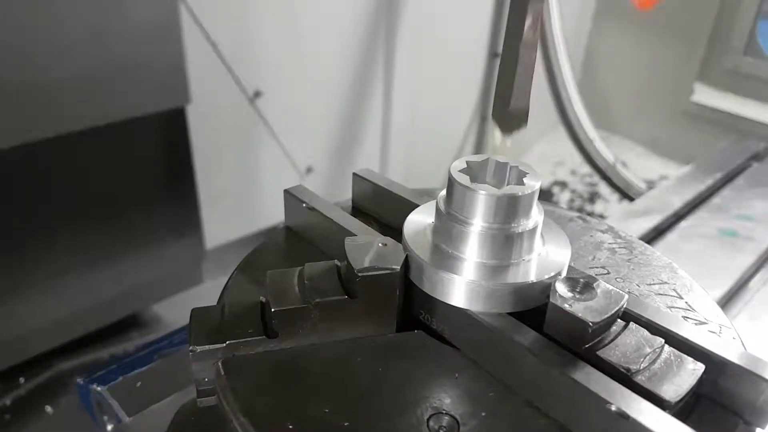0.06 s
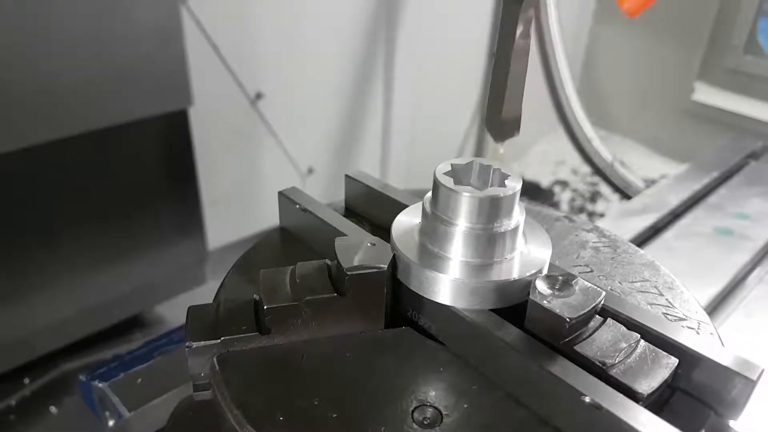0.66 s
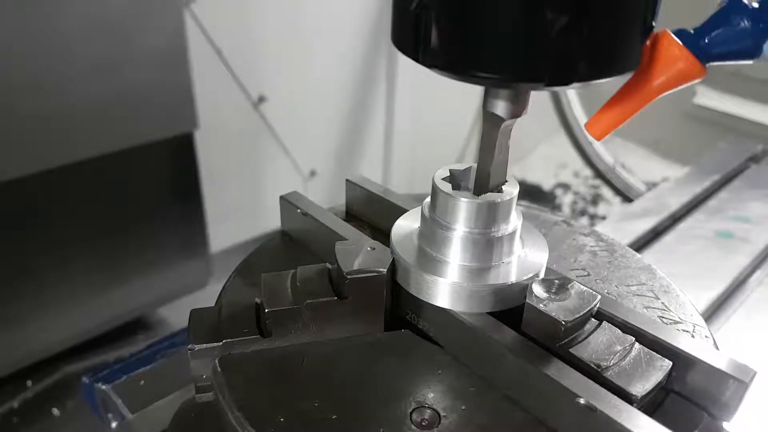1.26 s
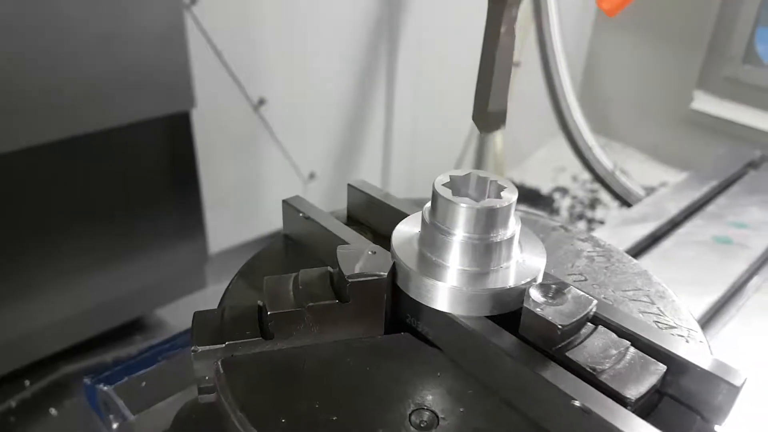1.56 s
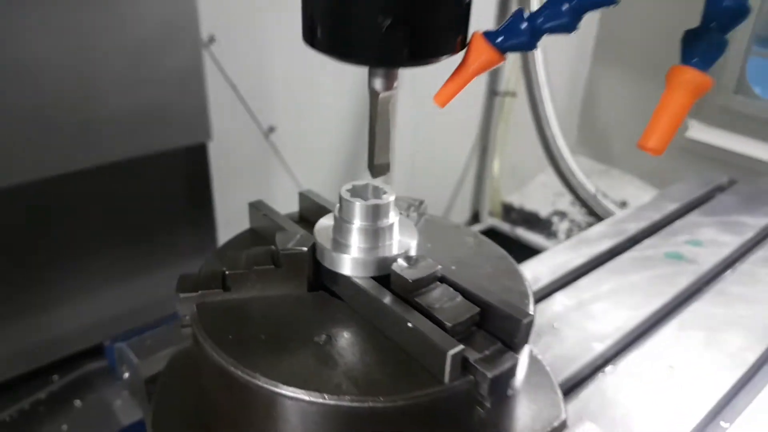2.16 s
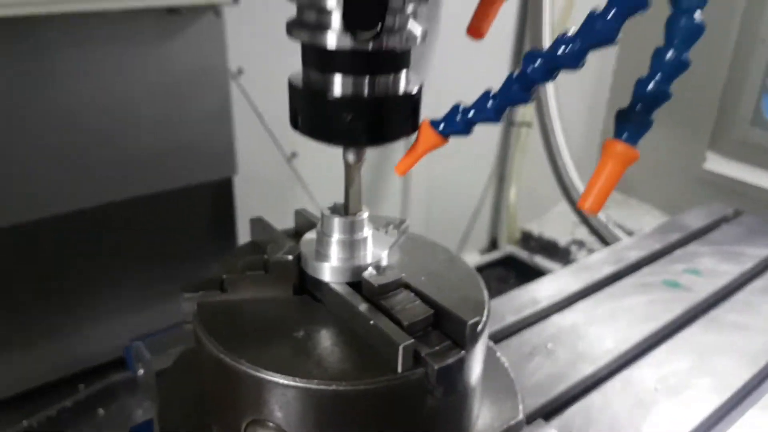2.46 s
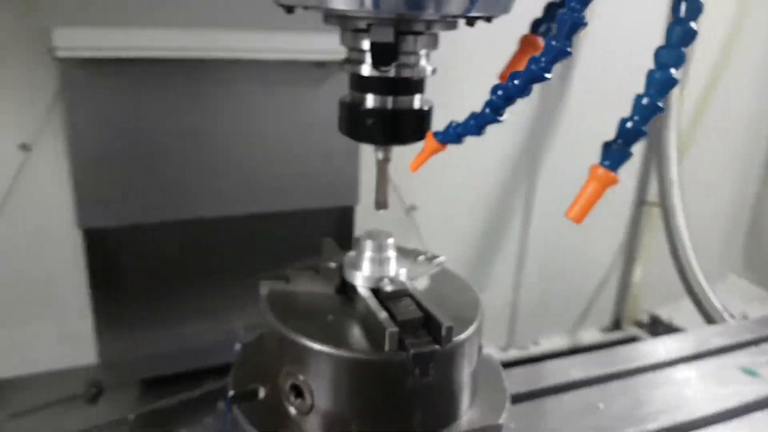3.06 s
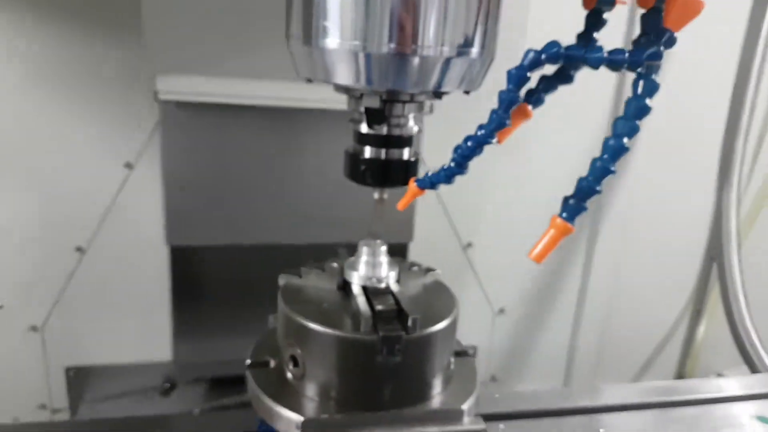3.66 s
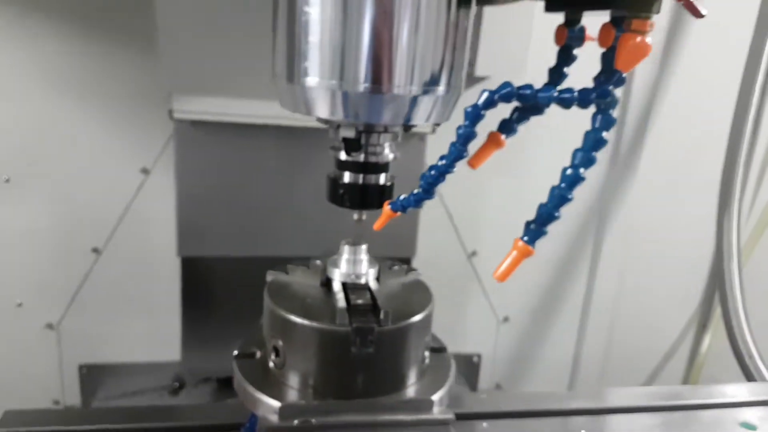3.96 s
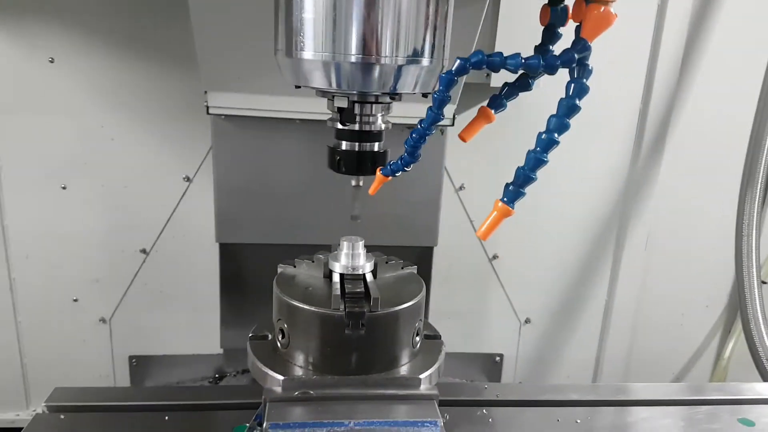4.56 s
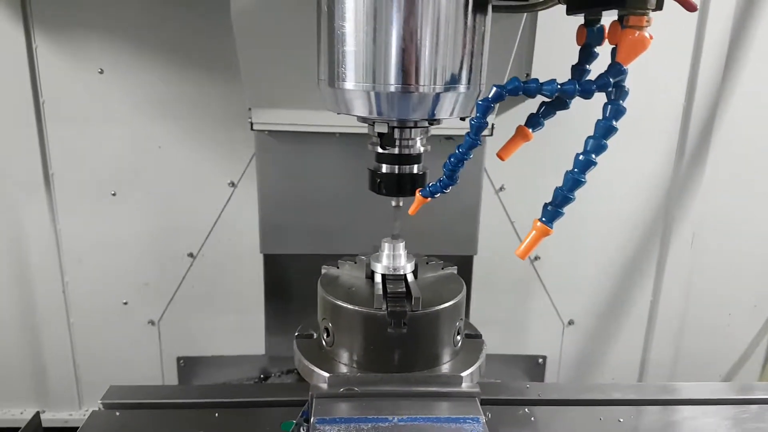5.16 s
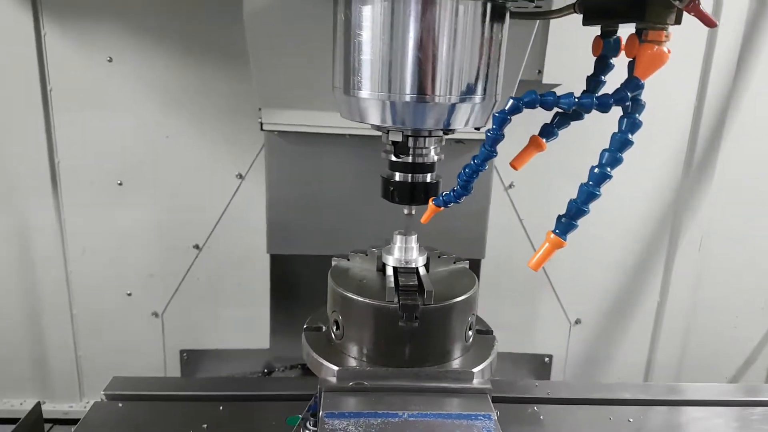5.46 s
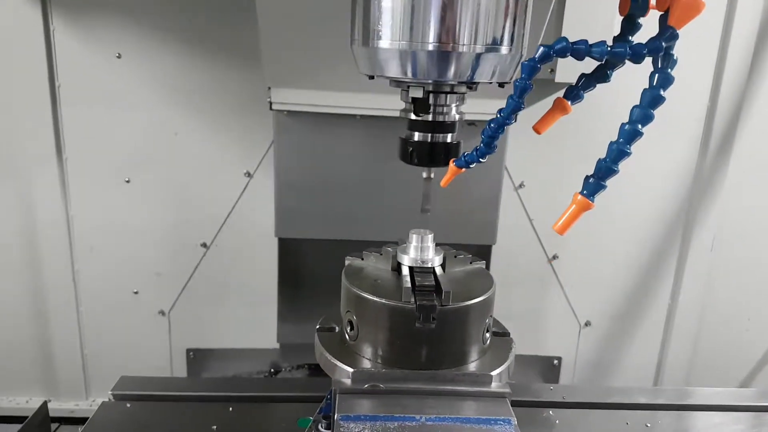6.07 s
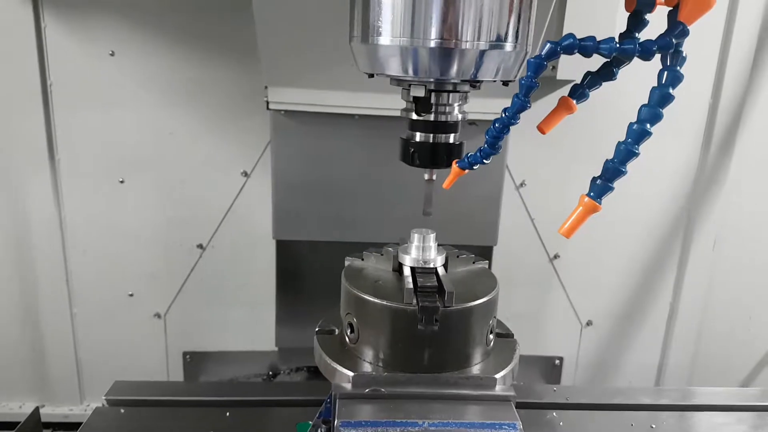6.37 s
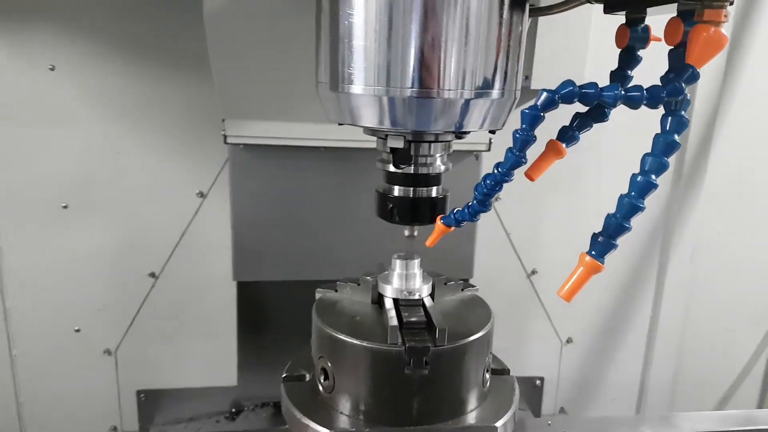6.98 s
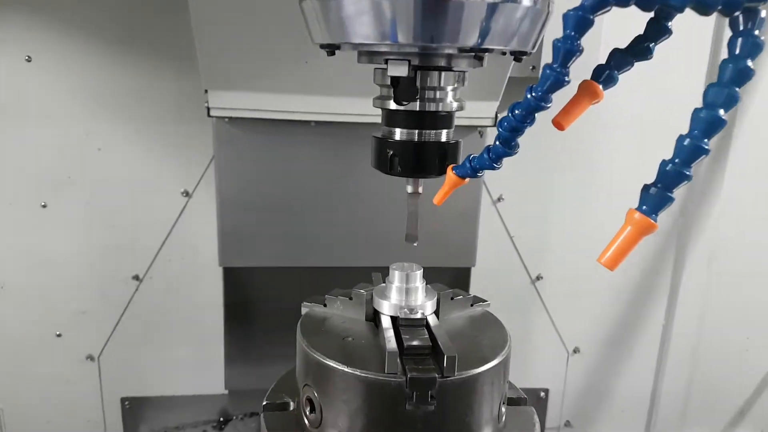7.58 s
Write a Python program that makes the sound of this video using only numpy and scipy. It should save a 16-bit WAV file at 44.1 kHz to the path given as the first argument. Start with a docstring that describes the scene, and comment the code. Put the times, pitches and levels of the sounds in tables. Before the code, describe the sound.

An air nozzle hisses loudly and without a break inside a machine tool's metal cabinet. About every second and a half, as the tool lifts and lowers, the sound swings from a high sizzle to a roaring, breathy whistle. Stray air thumps and rumbles on the close microphone for the first three seconds, then mostly falls away as it backs off. Pump and fans drone underneath.

```python
"""Keyway slotting with an air nozzle.

A machining centre slots a small metal bush inside its sheet-metal cabinet, a stroke about every 1.5 s.
An air nozzle rides with the tool: raised, its jet roars across the open bore and sets it sounding;
lowered, it sizzles on the rim. Deflected air buffets the microphone while close; pump and fans drone."""
import sys
import numpy as np
from scipy import signal
from scipy.fft import rfft, irfft, next_fast_len
from scipy.io import wavfile
from scipy.ndimage import uniform_filter1d

SR = 44100
rng = np.random.default_rng(int(sys.argv[2]) if len(sys.argv) > 2 else 0)


def digitize_waveform(pressure):
    """Quantize a signal to 16-bit integers and store it at the path in sys.argv[1].

    Rows of a 2-D input are taken as channels; values are limited to [-1, 1].
    """
    field = np.atleast_2d(pressure).T
    bounded = np.clip(field, -1, 1)
    quanta = np.round(bounded * 32767).astype(np.int16)
    wavfile.write(sys.argv[1], SR, quanta)


N = 345285

# microphone position, 0 close to 1 far: time_s, far
MIC_DISTANCE = [(0, 0.01), (1.5, 0.047), (2.2, 0.2), (3.0, 0.61), (4.3, 0.71), (5.2, 1), (6.6, 0.88),
                (7.83, 0.97)]
# stereo image of the broad noises: freq_hz, correlation, left_lead_rad
STEREO_IMAGE = [(40, -0.66, -1.5), (119, 1, -2.5), (290, 0.95, 0), (650, 0.58, 0.35), (1490, -0.18, 0),
                (2660, 0.56, 0.5), (3700, 0.06, -2.5), (4370, 0.26, 1.85), (5800, 0.85, 1.5),
                (7460, 0.2, 3), (10200, 0.6, 2), (15000, 0.1, 4)]
# pump and fan spectrum: freq_hz, left_db, right_db
DRONE_SPECTRUM = [(20, -82, -88), (60, -87, -87), (93, -73, -78), (112, -58, -57.5), (143, -60.5, -61.5),
                  (174, -54.5, -55), (198, -58, -58), (221, -51.5, -51), (244, -53.5, -53),
                  (290, -67, -65.5), (346, -60.5, -62), (420, -70.5, -70.5), (630, -65.5, -68.5),
                  (1010, -96, -81)]
# draught until the microphone backs out of the stream: time_s, left_db, right_db
STRAY_DRAUGHT = [(0, -24.5, -28.5), (.55, -28, -39), (1.8, -33.5, -36), (2.85, -29.5, -50),
                 (2.96, -47, -58), (7.83, -93, -49)]
# gusts off the work: peak_s, swell_s, fade_s, left_db, right_db
WORK_GUSTS = [(.03, .08, .05, -17.5, -20), (0.849, 0.13, 0.2, -18, -24), (1.18, 0.15, .13, -15, -16),
              (1.37, .09, .11, -15.5, -15.5), (2.45, .14, 0.17, -24.5, -37), (2.76, 0.14, 0.097, -21, -56),
              (4.18, .06, .06, -26, -48), (5.53, 0.029, .04, -34, -57), (7.09, 0.12, 0.13, -32, -54)]
# strongest single eddies: time_s, relative_db
EDDY_THUMPS = [(0.059, -5), (0.279, -9), (0.35, -6), (0.53, -3), (1.582, -10), (1.942, -13), (2.124, -10),
               (2.167, -3.5), (2.222, -7), (2.375, -4), (2.463, -8), (2.518, -2), (2.611, -3), (2.656, -6),
               (2.715, -6), (2.764, -3), (2.794, -11), (2.898, -5.5), (4.153, -9), (4.179, -15),
               (7.017, -4), (7.029, -6), (7.129, -3.5), (7.164, -7)]
# low cabinet resonance: freq_hz, relative_db
HOLLOW_SPECTRUM = [(800, -30), (1080, -8), (1170, -1), (1340, -2), (1420, -14), (1490, -1), (1620, -10),
                   (1850, -1), (2200, -20), (5000, -45)]
# thin cabinet rings: freq_hz, width_hz, relative_db
CABINET_RINGS = [(2310, 190, -16.5), (4200, 82, -9), (4350, 46, -10.5), (5230, 160, -11)]
# tool strokes, levels as offsets:
# start_s, pause_s, bore_db, bore_hz, graze_db, hollow_db, hiss_db, ring_hz, ring_width_hz, ring_db
TOOL_STROKES = [(-0.125, 0.11, .3, 3900, -.5, 5, 1, 4095, 44.7, -6),
                (1.365, 0.21, 0.4, 3820, 1, 4.5, 0.6, 3740, 220, -7.5),
                (2.8, 0.15, 1, 4050, -0.5, -4, 0.1, 4040, 70, -9),
                (4.25, .18, -0.5, 3830, 1.2, -1.5, 1, 3576, 40, -6.5),
                (5.7, .16, 0.4, 3830, 0.7, -0.5, 2.6, 3690, 55, -9),
                (7.16, 0.14, 3, 4060, 2, 0, 2, 4080, 55, -9)]
# base levels by tool height: height, bore_db, roar_db, graze_db, sizzle_db, hollow_db
LEVELS_BY_HEIGHT = [(0, -38.5, -39.5, -30, -19, -41), (.12, -29, -37.5, -27, -19, -35),
                    (.22, -23, -35.5, -24.5, -18.5, -45), (.36, -21, -31.5, -21.5, -22.5, -34),
                    (.46, -22, -34, -26, -24, -42), (.55, -16.5, -27.5, -23, -26, -39),
                    (.67, -18.5, -29.5, -28, -29.5, -32), (.84, -20.5, -28, -29, -26.5, -34),
                    (1, -22.5, -30.5, -30, -27.5, -33.5)]
# spectra of nozzle hiss, free jet and grazing jet: freq_hz, left_db, right_db
HISS_SPECTRUM = [(400, -72, -75.5), (950, -66.5, -69), (1240, -67, -70.5), (1680, -68.5, -75.5),
                 (2360, -73, -70.5), (3630, -58.5, -61), (4250, -66, -64), (4823, -89, -63),
                 (6120, -60, -59), (6860, -62.5, -56.5), (8340, -61, -69), (10000, -61.5, -64),
                 (11800, -61, -61), (15700, -64, -64)]
ROAR_SPECTRUM = [(199.6, -39, -30), (596, -11, -6.5), (1000, -10, -12.5), (1300, 0.5, -6), (1750, -10, -7),
                 (2160, 3, 2), (2900, 2.5, 0.5), (3430, -2.5, 5), (5000, -24, 0), (9000, -31, -43),
                 (16000, -4.5, -21)]
GRAZE_SPECTRUM = [(2440, -12, -14), (4140, 1, 3), (4970, 0.5, 9.5), (5270, 4.5, 6), (6320, -3.5, 1.5),
                  (6900, -23, -21), (8550, 0, -2.5), (11000, -19, -19), (16000, -22, -26)]
# sizzle as the microphone turns to the rim and away: time_s, correlation, gain_db, crest_share_db
RIM_FACING = [(0, -.8, 2, -8), (1.4, -.45, -2.5, -6), (2.25, .85, 3.5, -3.5), (2.8, .6, -.5, -3),
              (3.4, -.1, -1.5, -13), (4.3, .4, 0, -10), (4.9, -0.46, 1, -13), (5.6, -.35, 2.5, -8),
              (6.3, .2, 0, -12), (7.83, -0.47, 0.5, -14)]

LIFT_S, STROKE_S, SETTLE_S = 0.28, 1.381, 0.06
BORE_DROP_HZ = 120  # from tool down to tool raised
CREST_HZ, CREST_DROP_HZ, CREST_DROP_HEIGHT = 13150, 1150, 0.27
DRONE_FAR_DB, ROAR_FAR_DB, GRAZE_FAR_DB, RINGS_FAR_DB = 9, 2, 3.5, 20  # far against close
RING_GROWTH_DB_PER_DB, RING_PIVOT_DB = 0.26, -21
CUTOFF_HZ = 15750


def from_db(db):
    """Decibels to gain."""
    return 10 ** (np.asarray(db) / 20)


def unit_rms(x):
    """Scale to unit power."""
    return x / np.sqrt(np.mean(x ** 2) + 1e-20)


def over_time(rows):
    """Table columns interpolated at every sample."""
    time_s, *columns = np.transpose(rows)
    return [np.interp(np.arange(N) / SR, time_s, column) for column in columns]


def over_hz(rows, hz):
    """Table columns interpolated over log frequency."""
    knots_hz, *columns = np.transpose(rows)
    return np.array([np.interp(np.log(hz + 1), np.log(knots_hz), column) for column in columns])


def drift(rate_hz, hop=40):
    """Slow random wander, unit spread."""
    pole = np.exp(-2 * np.pi * rate_hz * hop / SR)
    white = rng.standard_normal(N // hop + 2002)
    slow = signal.lfilter([1], [1, -2 * pole, pole * pole], white)[2000:]
    return np.interp(np.arange(N) / hop, np.arange(len(slow)), unit_rms(slow))


def stereo(mid, side, correlation):
    """Correlated left and right from two independent noises."""
    correlation = np.clip(correlation, -.98, .98)
    return (np.sqrt(1 + correlation) * mid + np.sqrt(1 - correlation) * side * [[1], [-1]]) / np.sqrt(2)


def butter(x, hz, kind, order):
    """Butterworth low- or high-pass."""
    return signal.sosfilt(signal.butter(order, hz, kind, fs=SR, output="sos"), x + 1e-18)


def resonator(hz, width_hz):
    """Band-pass coefficients, unit peak gain."""
    r = np.exp(-np.pi * width_hz / SR)
    return np.array([1, 0, -1]) * (1 - r * r) / 2, [1, -2 * r * np.cos(2 * np.pi * hz / SR), r * r]


def coloured_noise(spectrum):
    """Stereo noise from a spectrum in dB per Hz."""
    size = next_fast_len(N, True)
    hz = np.fft.rfftfreq(size, 1 / SR)
    correlation, lead_rad = over_hz(STEREO_IMAGE, hz)
    mid, side = rfft(rng.standard_normal((2, size)))
    white = stereo(mid, side, correlation) * np.exp(.5j * lead_rad * [[1], [-1]])
    return irfft(white * from_db(over_hz(spectrum, hz)), size)[:, :N] * np.sqrt(SR / 2)


def ringing_noise(hz, width_hz):
    """Stereo noise in one narrow resonance."""
    narrow = signal.lfilter(*resonator(hz, width_hz), rng.standard_normal((2, N)))
    return unit_rms(signal.lfilter(*resonator(hz, 4 * width_hz), narrow))


def gliding_noise(hz, width_hz, block=512):
    """Two independent noises, twice through a moving resonance."""
    out, state = rng.standard_normal((2, N)), np.zeros((2, 2, 2))
    for i in range(0, N, block):
        section = np.concatenate(resonator(hz[i], width_hz))
        out[:, i:i + block], state = signal.sosfilt([section, section], out[:, i:i + block], zi=state)
    return unit_rms(out)


def machine_drone(far):
    """Pump and fans, louder from farther back."""
    return coloured_noise(DRONE_SPECTRUM) * from_db(DRONE_FAR_DB * (np.minimum(far / .87, 1) - 1))


def draught_db():
    """Air on each microphone port: stray flow plus gusts."""
    t = np.arange(N) / SR
    power = from_db(over_time(STRAY_DRAUGHT)) ** 2
    for peak_s, swell_s, fade_s, left_db, right_db in WORK_GUSTS:
        gust = np.exp(-((t - peak_s) / np.where(t < peak_s, swell_s, fade_s)) ** 2)
        power += gust * from_db([[left_db], [right_db]]) ** 2
    return 10 * np.log10(power)


def port_pulses(clicks, body_hz, front_hz):
    """An eddy on a port: steep pressure front, short decay, undershoot."""
    decays = butter(clicks, body_hz, "low", order=1)
    pulses = butter(decays, front_hz, "low", order=1)
    return butter(pulses, 82, "high", order=2)


def strong_eddies():
    """Lone thumps of air, mainly on the left port."""
    time_s, relative_db = np.transpose(EDDY_THUMPS)
    clicks = np.zeros(N)
    clicks[(time_s * SR).astype(int)] = from_db(relative_db) * rng.choice([-1, 1], len(time_s))
    return port_pulses(clicks, body_hz=158, front_hz=2000) * from_db([[39], [17]])


def buffeting(saturation=.6):
    """Random eddies, denser and sharper in a stronger draught; the largest saturate the ports."""
    level_db = draught_db() + 1.2 * drift(11)
    eddies_per_s = np.clip(2000 * from_db(2.3 * (level_db + 16)), 48, 6000)
    arrivals = rng.random((2, N)) < eddies_per_s / SR
    sizes = from_db(4.8 * np.clip(rng.standard_normal((2, N)), -2, 1))
    clicks = arrivals * sizes * rng.choice([-1, 1], (2, N)) / np.sqrt(eddies_per_s)
    soft = unit_rms(port_pulses(clicks, body_hz=131, front_hz=1370))
    sharp = unit_rms(port_pulses(clicks, body_hz=465, front_hz=5000))
    sharpness = np.clip((level_db + 25.5) / 10, 0, 1)
    pressure = (soft + sharpness * (sharp - soft)) * from_db(level_db + 2.5) + strong_eddies()
    return butter(saturation * np.tanh(pressure / saturation), 22, "high", order=2)


def hollow_note(level_db):
    """Broad low cabinet resonance, stirred by the free jet."""
    return unit_rms(coloured_noise(HOLLOW_SPECTRUM)) * from_db(level_db + 1.1 * drift(8))


def thin_rings(bore_db, far):
    """Narrow resonances fed by the bore tone's turbulence: a standing set plus one per stroke."""
    t = np.arange(N) / SR
    rings = sum(ringing_noise(hz, width_hz) * from_db(db) for hz, width_hz, db in CABINET_RINGS)
    rings *= from_db(RINGS_FAR_DB * (far - 1))
    for start_s, *_, hz, width_hz, ring_db in TOOL_STROKES:
        swell = np.interp(t - start_s, [0, LIFT_S, .85, STROKE_S], [0, 1, 1, 0])
        rings += ringing_noise(hz, width_hz) * swell * from_db(ring_db)
    growth_db = RING_GROWTH_DB_PER_DB * (bore_db - RING_PIVOT_DB)
    return rings * from_db(bore_db + growth_db + [[-3.5], [1.5]])


def cabinet_echoes(x, far, echo_db=-16.5, fade_db_per_s=280, count=18):
    """Steel walls reflect within milliseconds; the comb shifts as the microphone moves."""
    n = np.arange(N)
    out, power = x.copy(), 1
    echoes = rng.uniform([.001, -1.02, -1.02, -1.03], [.016, 0.98, 0.95, 0.93], (count, 4))
    for delay_s, travel, *port_skews in echoes:
        gain = from_db(echo_db - fade_db_per_s * delay_s)
        lag_samples = (delay_s + 0.00069 * travel * far) * SR
        for port, skew in enumerate(port_skews):
            out[port] += gain * np.interp(n - lag_samples - 15 * skew, n, x[port], left=0)
        power += gain ** 2
    return out / np.sqrt(power)


def tool_height():
    """0 in the slot, 1 raised: quick eased lift, pause, steady feed down."""
    t, height = np.arange(N) / SR, 0
    for start_s, pause_s, *_ in TOOL_STROKES:
        lift = (1 - np.cos(np.pi * np.clip((t - start_s) / LIFT_S, 0, 1))) / 2
        feed = np.interp(t - start_s, [LIFT_S + pause_s, STROKE_S], [0, 1])
        height = height + lift - feed
    return height


def flow_levels_db(height):
    """Air levels follow the tool, power-averaged over the flow's settling time."""
    heights, *columns = np.transpose(LEVELS_BY_HEIGHT)
    power = from_db([np.interp(height, heights, column) for column in columns]) ** 2
    return 10 * np.log10(uniform_filter1d(power, int(SETTLE_S * SR), mode="nearest"))


def stroke_settings():
    """Each stroke's bore, graze, hollow and hiss settings: held, then blended while the tool is low."""
    hold_s = (LIFT_S / 2, STROKE_S - LIFT_S)
    return over_time([(start_s + after_s, *settings[:5])
                      for start_s, _, *settings in TOOL_STROKES for after_s in hold_s])


def rim_sizzle(level_db, height):
    """The jet's core splits on the sharp rim: high hiss with a crest that sinks as the tool lifts."""
    correlation, facing_db, crest_db = over_time(RIM_FACING)
    plateau = butter(rng.standard_normal((2, N)), 10900, "high", order=10)
    plateau = butter(plateau, 15600, "low", order=5)
    plateau = stereo(*unit_rms(plateau), correlation) * from_db([[1.4], [-2]])
    crest_hz = CREST_HZ - CREST_DROP_HZ * np.minimum(height / CREST_DROP_HEIGHT, 1) + 60 * drift(8)
    crest = stereo(*gliding_noise(crest_hz, width_hz=1000), correlation) * from_db([[-1.5], [1]])
    share = np.clip(from_db(crest_db), 0, .9)
    sizzle = np.sqrt(1 - share ** 2) * plateau + share * crest
    return sizzle * from_db(level_db + facing_db + 0.9 * drift(13))


def air_jet(hiss_db, roar_db, graze_db, far):
    """Steady hiss at the nozzle, a roar when running free, brighter noise where it grazes the bore."""
    roar_db = roar_db + 6 + ROAR_FAR_DB * (far - 1)
    graze_db = graze_db + 3.5 + GRAZE_FAR_DB * (far - 1)
    hiss = coloured_noise(HISS_SPECTRUM) * from_db(hiss_db + 0.89 * drift(19))
    roar = unit_rms(coloured_noise(ROAR_SPECTRUM)) * from_db(roar_db + 1.1 * drift(17))
    graze = unit_rms(coloured_noise(GRAZE_SPECTRUM)) * from_db(graze_db + 0.96 * drift(28))
    return hiss + roar + graze


def bore_tone(level_db, centre_hz, height, far):
    """Turbulence drives the bush's air column to a breathy whistle that sinks as the tool clears it."""
    pitch_hz = centre_hz - BORE_DROP_HZ * (height - .5) + 45 * drift(6.8)
    core = gliding_noise(pitch_hz, width_hz=520) * from_db(-4.5 - 13 * far)
    breath = gliding_noise(pitch_hz, width_hz=1550)
    whistle = stereo(*unit_rms(breath + core), correlation=0.23) * from_db([[-3.5], [1.5]])
    return whistle * from_db(level_db + 0.25 + .5 * drift(14))


def scene():
    """Air noise in the cabinet, machine drone, draught on the microphone."""
    (far,) = over_time(MIC_DISTANCE)
    height = tool_height()
    bore_db, roar_db, graze_db, sizzle_db, hollow_db = flow_levels_db(height)
    bore_trim_db, bore_hz, graze_trim_db, hollow_trim_db, hiss_db = stroke_settings()
    bore_db = bore_db + bore_trim_db
    nozzle = (air_jet(hiss_db, roar_db, graze_db + graze_trim_db, far)
              + bore_tone(bore_db, bore_hz, height, far)
              + rim_sizzle(sizzle_db, height))
    air = cabinet_echoes(nozzle, far)
    resonances = thin_rings(bore_db, far) + hollow_note(hollow_db + hollow_trim_db)
    return air + resonances + machine_drone(far) + buffeting()


def record(dry):
    """Clip at full scale, then a steep low-pass."""
    low_pass = signal.ellip(12, .1, 80, CUTOFF_HZ, fs=SR, output="sos")
    return signal.sosfilt(low_pass, np.clip(dry, -1, 1))


dry = scene()
out = record(dry)
digitize_waveform(out)
```